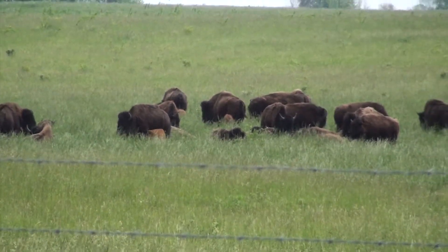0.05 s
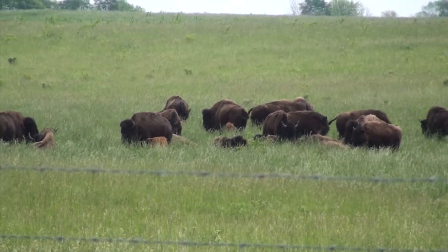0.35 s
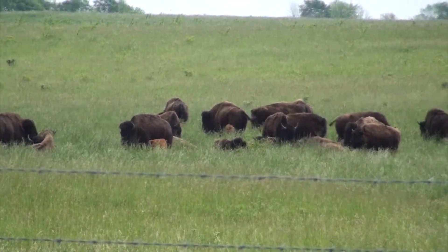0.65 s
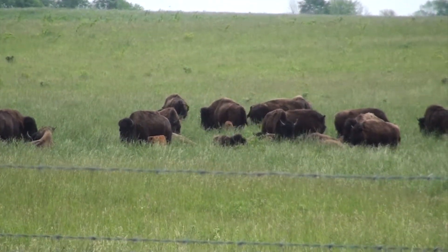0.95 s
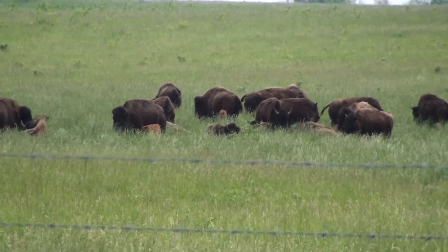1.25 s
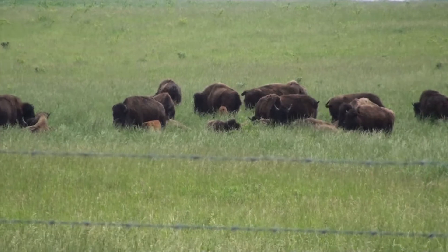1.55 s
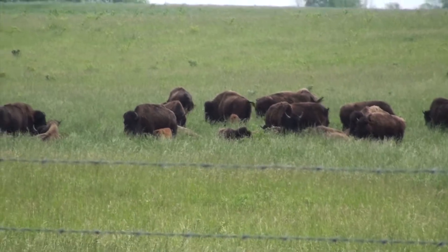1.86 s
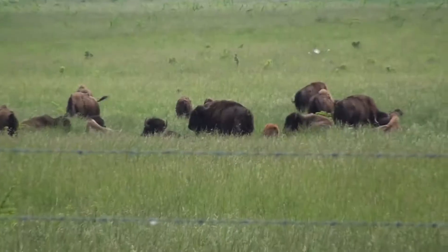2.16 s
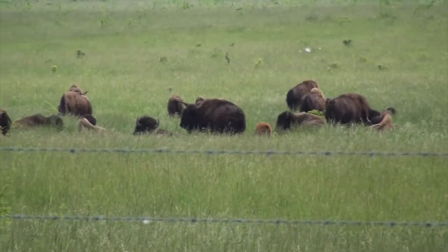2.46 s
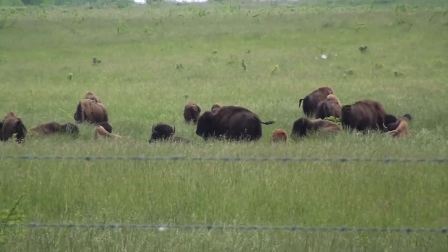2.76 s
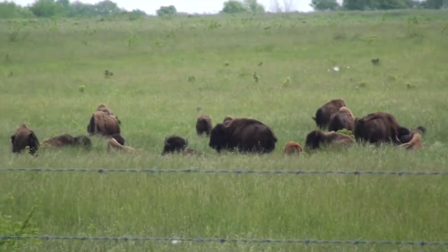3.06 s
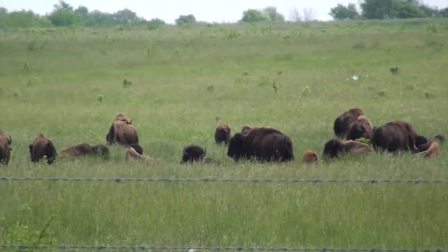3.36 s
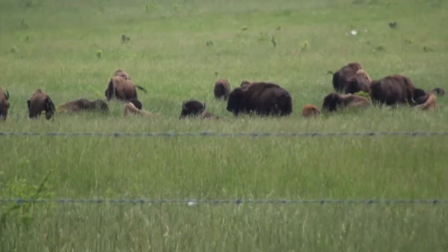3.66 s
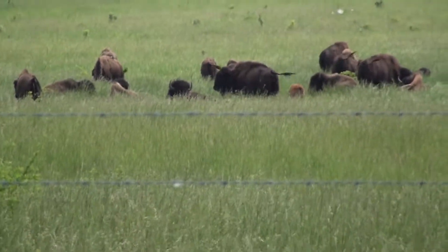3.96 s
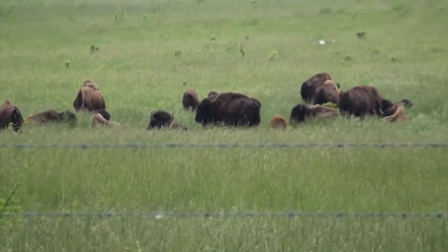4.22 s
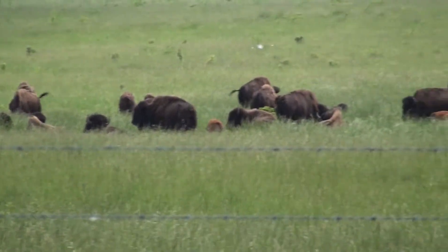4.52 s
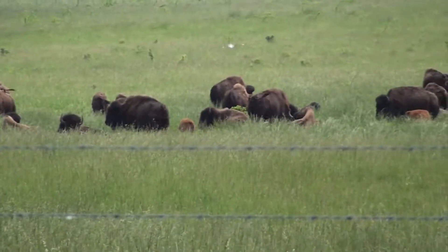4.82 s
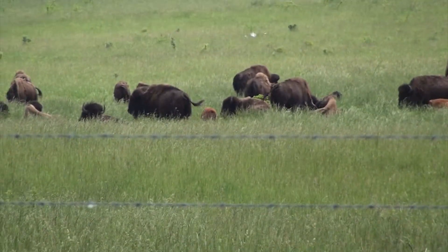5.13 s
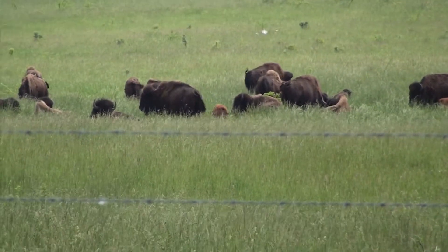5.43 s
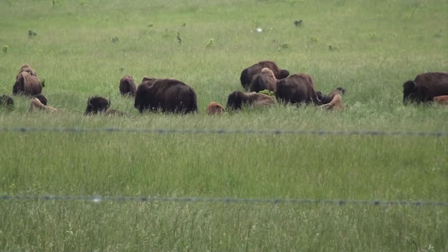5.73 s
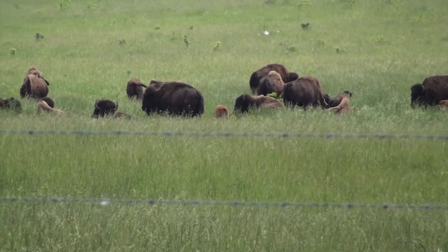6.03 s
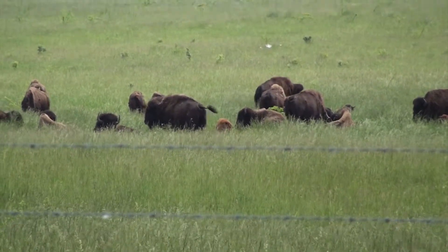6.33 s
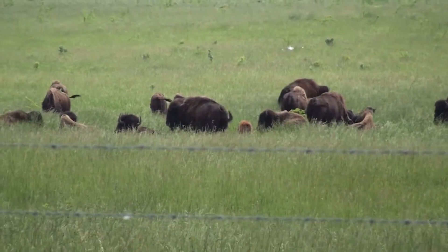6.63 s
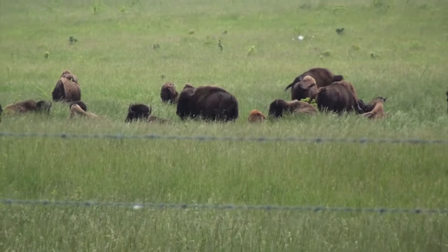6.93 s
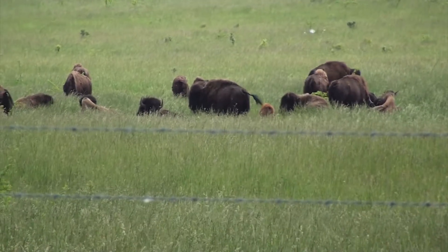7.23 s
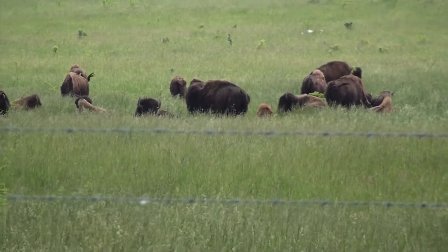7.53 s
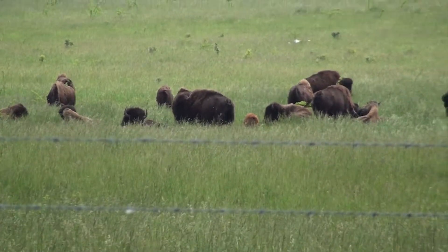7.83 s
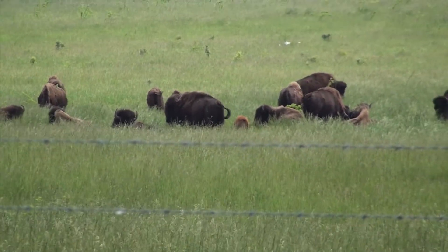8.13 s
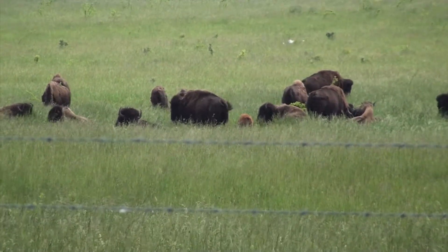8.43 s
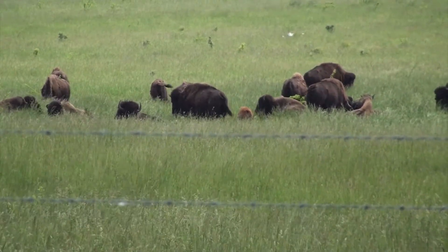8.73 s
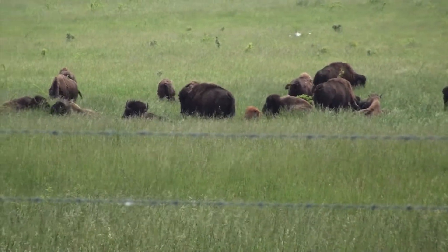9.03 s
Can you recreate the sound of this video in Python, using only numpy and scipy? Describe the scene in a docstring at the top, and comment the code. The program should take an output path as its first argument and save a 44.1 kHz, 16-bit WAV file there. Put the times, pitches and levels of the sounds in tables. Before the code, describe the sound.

Wind rumbles unevenly on the microphone in open grassland, over a faint grass hiss and the hum of a distant road. Swallows twitter and rattle throughout, and far songbirds add faint chips and slurred notes. The wind is light at first, with a soft thump near 1 second and a stronger gust at 2. A blackbird gives a long, piercing, slightly falling whistle from 2.2 to 2.6 seconds. A few light dry ticks sound close by between 4.5 and 6.7 seconds, while distant cars swell past, most clearly around 6. From about 5.1 to 5.7 seconds a close swallow scolds in quick harsh rattles, ending in a sharp chip and fading twitter. The blackbird whistles again at 7.1 seconds. From there the wind is at its strongest, with repeated thumps and crackle, and a swallow's twitter grows louder around 9 seconds.

```python
"""Open grassland on a breezy day, near a distant road. Turbulent eddies press on the microphone as rumble and
crackle, and heavy thumps sound now and then; tyres hum, swelling as cars pass, and the grass hisses faintly. A
blackbird gives two long piercing whistles, swallows twitter and rattle (one passes close), and far songbirds
slur faint notes. Each voice is a tone of the syrinx, modulated in pitch and loudness and scattered by grass and
fence. A few light, dry ticks sound close by."""
import sys
import numpy as np
from scipy import signal
from scipy.fft import rfft, irfft
from scipy.io import wavfile

SR = 44100
rng = np.random.default_rng(int(sys.argv[2]) if len(sys.argv) > 2 else 0)


def wav_out(sig):
    """Save sig, one row per channel (or a flat mono array), as 16-bit PCM at SR to the path in sys.argv[1]."""
    wavfile.write(sys.argv[1], SR, np.round(np.clip(np.atleast_2d(sig).T, -1, 1) * 32767).astype(np.int16))


N = 404838
TIME = np.arange(N) / SR

# Levels are relative within each table. A balance is the left level minus the right.
# Gust strength. Each row: time in seconds, slow rumble in dB, fast flutter in dB.
GUSTS = [(0.0, -44, -52), (0.46, -39, -52), (0.54, -38, -38), (0.64, -51, -59), (0.74, -37, -41),
         (0.87, -28, -33), (0.97, -47, -57), (1.05, -25, -30), (1.25, -40, -53), (1.63, -39, -54),
         (1.74, -31, -36), (1.94, -38, -39), (1.965, -35, -36), (1.995, -22.5, -24.5), (2.32, -30, -26),
         (2.58, -30, -37), (2.76, -28, -22), (3.25, -28, -24), (3.48, -28, -30), (3.6, -35, -40),
         (4.24, -29.5, -26), (4.55, -32.5, -37), (5.09, -30.5, -29), (5.29, -37.5, -44), (5.45, -27.5, -34),
         (5.67, -45.5, -55), (5.75, -18, -25), (5.8, -35, -31), (5.96, -22, -22), (6.03, -25, -22),
         (6.45, -29, -36), (6.76, -28, -42), (7.01, -21, -25), (7.03, -29, -30), (7.23, -23, -27),
         (7.59, -29, -30), (7.65, -17, -22), (7.72, -25, -22), (7.95, -24, -24), (8.1, -26, -30),
         (8.33, -22, -20.5), (8.48, -23, -26), (8.58, -21, -19), (8.72, -22, -23), (8.82, -29, -35),
         (8.87, -17, -24), (8.9, -24, -23), (9.02, -22, -21), (9.15, -21, -23.5), (9.18, -28, -25)]
# Side the wind comes from. Each row: time in seconds, relative balance in dB.
WIND_SIDE = [(0, -3), (2, 0), (2.7, -0.02), (3.3, -.5), (4.5, -0.43), (5.7, 0), (6.7, 0), (7.3, 2),
             (7.7, 0), (9.18, 2)]
# Strength of the finest eddies. Each row: time in seconds, level in dB.
RAGGEDNESS = [(0, -4), (1.6, -4), (2.15, 2), (2.62, -7), (2.77, 0), (3.4, -2.5), (3.9, -6), (4.7, -5),
              (5.1, -1), (5.75, -4), (5.95, 3), (6.2, 0), (6.7, -2), (7.6, 2), (8.5, 4), (9.18, 6)]
# Wind spectra, from large eddies to small. Each row: frequency in Hz, spectral density in dB.
RUMBLE_SPECTRUM = [(10, -21), (25, -3.5), (45, -1), (75, 0.5), (115, -6), (170, -21), (400, -43),
                   (900, -80)]
FLUTTER_SPECTRUM = [(40, -19.5), (100, -4.5), (160, 0.5), (215, -3.5), (300, -13.5), (420, -25),
                    (700, -37.5), (1500, -61), (4000, -85)]
BLUSTER_SPECTRUM = [(90, -29), (200, -4), (280, -1), (380, -5.5), (520, -12), (800, -22.5), (1500, -39.5),
                    (4000, -75)]
RUSH_SPECTRUM = [(150, -27.5), (450, -2.5), (700, -3.5), (1200, -9.5), (2000, -16.5), (3000, -29.5),
                 (6000, -41.5), (12000, -64.5)]
# Phase between the microphone ports. Each row: frequency in Hz, lead of the left in radians.
PORT_PHASE = [(20, 0), (60, -.55), (125, -1.05), (300, -1.5), (500, -1.2), (860, -.5), (2150, -.15)]
# Spectra of the other noises. Each row: frequency in Hz, spectral density in dB.
ROAD_SPECTRUM = [(100, -10), (330, -16), (580, -12), (780, -3), (980, 0.5), (1250, -4), (1550, -8.5),
                 (2000, -12.5), (2600, -21.5), (3500, -26.5), (6000, -46)]
CAR_SPECTRUM = [(250, -21), (580, -15), (730, -3.5), (850, 2), (1000, -4), (1350, -16.5), (2000, -24),
                (3000, -37), (5000, -58)]
TYRE_SPECTRUM = [(600, -35), (1250, -12), (1600, -3), (2000, 0), (2350, -12), (3000, -24), (5000, -48)]
GRASS_SPECTRUM = [(500, 1.5), (3000, -2.5), (4300, 4.5), (5500, -3), (7000, -6), (8600, -6), (9800, -10.5),
                  (12500, -7.5), (14400, -11), (15200, -18.5)]
CRACKLE_SPECTRUM = [(90, -14), (250, 0), (450, -3), (800, -9), (1500, -17), (2500, -26), (4000, -36),
                    (8000, -55)]
TICK_SPECTRUM = [(500, -15), (1100, 0), (1500, -3), (2000, -1), (2500, -14), (3500, -30), (8000, -60)]
# Envelopes of the far road, the grass and the far birds. Each row: time in seconds, level in dB.
ROAD_LEVEL = [(0, -43.5), (1.95, -43), (2.1, -45.5), (2.55, -52.5), (3.3, -48.5), (4.4, -48), (5.9, -47.5),
              (9.18, -44)]
GRASS_LEVEL = [(0, -58.5), (1.98, -58.5), (2.06, -62), (9.18, -62)]
CHORUS_LEVEL = [(0, 1.5), (1.1, 1.5), (1.5, -2), (3.2, -2.5), (3.6, -7), (4.6, -6), (4.9, 4), (5.9, 1),
                (6.4, -7), (8.2, -8), (9.18, 0)]
# Nearer cars. Each row: time when closest in seconds, roar in dB, tyre hiss in dB,
# seconds to fall by about 3 dB.
CAR_PASSES = [(4.58, -43.5, -53, 0.3664), (5.93, -34.3, -41, 0.3258), (6.3, -42, -52, 0.1265),
              (6.5, -54, -47, .12), (7.25, -40.5, -59, 0.4377)]
# Lone gliding notes. Each row: start and length in seconds, first and last pitch in Hz,
# level in dB, bend (positive glides early, negative late).
SLURS = [(.625, 0.22, 2143, 2137, -54, 1), (.66, .06, 3650, 3950, -58, 1), (.66, .05, 3020, 3130, -59, 1),
         (.86, .04, 2500, 2750, -57, 1), (1.13, .025, 8900, 6850, -53, 2.5),
         (1.147, .062, 6950, 6430, -54, 1.2), (1.207, .006, 6900, 5450, -46, 1),
         (1.211, 0.064, 5560, 4650, -44, .5), (1.212, 0.06, 5230, 4130, -47, 0.3),
         (1.222, .045, 3780, 4050, -55, 1), (1.281, .013, 5200, 8300, -55, .5),
         (1.511, 0.084, 2463, 2280, -53, -0.5), (1.56, .22, 3200, 3270, -63, 1),
         (1.681, 0.0227, 7000, 5680, -49, 5), (1.697, 0.02, 5670, 8690, -57, -.5),
         (1.51, .055, 3850, 3970, -58, 1), (2.112, 0.162, 3782, 3558, -58, 1),
         (2.115, .065, 6780, 6620, -58, 1), (2.459, 0.0827, 4850, 4570, -50, 2),
         (2.615, 0.088, 4260, 3762, -56.5, 1.5), (2.714, 0.079, 2936, 2980, -54.5, 2),
         (2.79, .14, 2980, 3100, -62, 1), (3.021, 0.158, 3392, 3510, -64, -0.5),
         (3.86, .15, 4538, 4152, -59, 2.5), (4.149, 0.158, 5310, 5222, -65.5, 0.5),
         (5.656, 0.022, 4700, 4180, -25, 2), (5.682, 0.118, 5610, 5560, -58, 1),
         (6.14, .05, 4450, 4350, -62, 1), (6.19, .11, 4080, 3830, -65, 1), (6.68, .2, 4090, 3990, -66, 2),
         (6.882, .025, 6650, 6550, -60, 1), (7.0, .02, 6600, 6650, -62, 1),
         (7.7, 0.065, 3480, 3250, -60, 1.5), (7.96, .055, 3600, 3430, -62, 1),
         (8.115, .06, 6700, 6520, -65, 1), (8.208, 0.125, 5110, 4920, -60, 1.5),
         (8.608, .022, 4470, 4380, -51, 1), (8.632, .035, 4450, 4330, -55, 1),
         (8.672, .022, 4400, 4320, -55, 1), (8.7, .04, 4420, 4330, -59, 1),
         (9.088, .03, 6550, 5950, -50, .3), (6.03, .07, 5500, 5150, -60, 1),
         (7.485, .055, 3450, 3200, -62, .3)]
# Lone trills. Each row: start and length in seconds, first and last pitch in Hz, level in dB,
# sweeps per second, sweep depth as a share of the pitch.
TRILLS = [(1.737, .132, 4042, 3113, -52, 140, .07), (1.28, 0.079, 7820, 7150, -57, 297, 0.087),
          (1.669, 0.042, 4603, 4326, -51, 86, 0.56), (2.113, .07, 8250, 7900, -53, 260, .16),
          (2.999, 0.072, 4405, 4183, -52.5, 223, 0.19), (3.298, 0.75, 8550, 8430, -73, 65, 0.212),
          (4.69, .055, 4350, 4350, -60, 115, .15), (4.738, .035, 6100, 5900, -58, 55, .2),
          (4.738, .04, 3950, 3750, -57, 55, .15), (5.003, .014, 6800, 6800, -59, 140, .25),
          (5.751, 0.0624, 10000, 8630, -56.5, 240, 0.081), (7.418, .046, 4850, 3950, -54, 200, .12),
          (7.678, .025, 4050, 3550, -58, 200, .12)]
# A far bird's pips. Each row: start in seconds, level in dB.
PIPS = [(.005, -61), (.2, -60), (.925, -60), (1.44, -58), (8.968, -57), (9.03, -57), (9.16, -51)]
# One beat of a rattle. Each row: share of the beat, pitch factor, amplitude from 0 to 1.
RATTLE_BEAT = [(0, 1.24, .05), (.11, 1.1, .75), (.24, .76, .3), (.31, 1.24, .75), (.42, 1.1, 1),
               (.62, .97, .6), (.82, .96, .3), (1, 1.05, .03)]
# Swallows' alarms. Each row: start and rattle length in seconds, pitch in Hz, level in dB.
ALARMS = [(.02, .046, 4950, -59), (.333, .05, 4950, -55.5), (.59, .046, 4950, -56.5),
          (.745, .046, 4900, -55), (.98, .046, 4950, -59), (1.926, .046, 4750, -46.5),
          (4.789, .046, 4750, -46.5), (5.063, .046, 4650, -37.5)]
# Swallows' twitter. Each row: start in seconds, level in dB, pitch factor.
TWITTERS = [(.062, -65, 1.03), (.127, -64, 1), (.192, -65, 0.99), (.428, -59, 0.92), (.505, -60, 1.024),
            (.857, -66, 1.017), (.93, -65, 0.97), (1.01, -64.5, 0.93), (2.18, -61.5, 1.0),
            (2.6, -62, 0.925), (4.87, -66, .94), (5.168, -56.5, 1.01), (5.26, -51.5, 1.02),
            (6.145, -67, .97), (6.228, -67, .96), (6.31, -66, .96), (7.665, -64.5, 0.98),
            (7.755, -65, 0.99), (8.775, -54, 0.985), (8.861, -51.5, 0.98), (8.945, -49.5, 0.98),
            (9.028, -46, 0.976)]
# Far birds' repeated calls. Each row: start in seconds, number of syllables, spacing in seconds.
CHIP_RUNS = [(.082, 5, .079), (3.35, 7, .08)]
SONG_RUN = (2.707, 5, .1255)
SPARROW_RUN = (8.367, 3, .092)
# Swell of those runs. Each pair: first and last level in dB.
SONG_DB, SPARROW_DB, CHIP_DB = (-58, -53), (-58, -51), [(-63, -59), (-64, -64)]
# Single thumps. Each row: time in seconds, level in dB, balance in dB, width in seconds.
THUMPS = [(0.522, -25, 2, .003), (1.045, -14.5, -0.5, .0038), (2.021, -8, 6.0, .0036),
          (2.159, -11, 0, .0025), (3.798, -20, 0, .002), (4.199, -16, -1, .002), (4.605, -19, 0, .002),
          (5.748, -9, 1.5, .003), (6.285, -11, 4, .002), (6.887, -14, 2, .003), (7.294, -9.5, 1.5, .0018),
          (7.398, -6, 2, .002), (7.625, -9, -1, .005), (8.255, -11, 0, .002), (8.357, -9, 0, .0012),
          (8.566, -5.5, -3.5, .0014), (8.606, -6.5, 2, .0013), (8.655, -11, 2, .002), (8.941, -11, 0, .002)]
# Tearing gusts. Each row: start and length in seconds, level in dB, upper edge in Hz.
CRACKLES = [(2.112, .025, -34, 3000), (6.951, .014, -36, 2500), (7.113, .016, -32, 1800),
            (7.292, .016, -28, 900), (7.393, .02, -19.5, 950), (7.66, .15, -31, 1300),
            (8.233, .013, -28, 1800), (8.254, .013, -29, 1400), (8.274, .045, -34, 3500),
            (8.342, .04, -27, 2200), (8.564, .026, -25, 4500), (8.606, .014, -25, 1200),
            (8.628, .035, -29, 3000), (8.878, .04, -29, 4500), (8.938, .025, -25, 4500),
            (9, .045, -25, 3500), (9.057, .02, -31, 4500)]
# Blackbird whistles. Each row: start and length in seconds, settled pitch in Hz,
# then levels in dB at the start, near the end and of the octave.
WHISTLES = [(2.171, 0.395, 5155, -41.5, -32.5, -69), (7.103, 0.3445, 5173, -39.5, -37.5, -78)]
# Dry ticks close by. Each row: start in seconds, level in dB.
TICKS = [(4.5017, -29), (4.5875, -30), (4.7255, -29.5), (5.7015, -30), (6.1928, -28), (6.2835, -26),
         (6.5051, -28), (6.7246, -34)]
# A close swallow's scolding. Each row: start and rattle length in seconds, pitch in Hz,
# level in dB, level of the opening flicks in dB.
SCOLDS = [(5.3745, .042, 5150, -31, -48), (5.451, .041, 4900, -28, -29.5),
          (5.5275, .041, 4750, -25.5, -29.5), (5.6062, .03, 4780, -24, -26)]
# Twitter that climbs in three steps. Each row: start in seconds, level in dB.
CLIMBS = [(5.812, -46), (5.895, -48.5), (5.976, -52.5)]


def amp(db):
    """Amplitude grows tenfold with every 20 dB."""
    return 10 ** (np.asarray(db) / 20)


def unit(x):
    """Normalisation to an rms of 1."""
    return x / np.sqrt(np.mean(x ** 2) + 1e-20)


def curves(rows):
    """Linear interpolation gives each column of a table one value per sample."""
    s, *columns = np.transpose(rows)
    return [np.interp(TIME, s, column) for column in columns]


def add(mix, s, sound):
    """Superposition: a sound joins the mix at s seconds."""
    part = mix[..., max(round(s * SR), 0):][..., :sound.shape[-1]]
    part += sound[..., :part.shape[-1]]


def filtered(x, order, hz, kind):
    """A maximally flat filter passes the low, high or middle band."""
    return signal.sosfilt(signal.butter(order, hz, kind, fs=SR, output="sos"), x)


def drift(size, hz):
    """Noise low-passed near hz is a smooth random motion of rms about 1."""
    padded = size + SR // 10
    rolloff = np.exp(-(np.fft.rfftfreq(padded, 1 / SR) / hz) ** 2)
    return unit(irfft(rfft(rng.standard_normal(padded)) * rolloff))[:size]


def over_frequency(rows, size):
    """Interpolation in log frequency gives one value per spectral bin."""
    hz, values = np.transpose(rows)
    return np.interp(np.log(np.fft.rfftfreq(size, 1 / SR) + 1), np.log(hz), values)


def noise(spectrum, correlation):
    """Partial coherence: two channels of coloured noise share some of their motion."""
    colour = amp(over_frequency(spectrum, N))
    mid, side = irfft(rfft(rng.standard_normal((2, N))) * colour, N)
    side *= np.sqrt((1 - correlation) / (1 + correlation))
    return unit(np.array([mid + side, mid - side]))


def panned(balance_db):
    """Constant-power panning: left and right gains of fixed total power."""
    gains = amp(np.array([balance_db, -balance_db]).reshape(2, -1) / 2)
    return gains / np.sqrt((gains ** 2).mean(0))


def wind(eddy_db=1.5, eddy_hz=30, full_db=-23, bluster_growth=1.288, rush_growth=1.16):
    """Turbulence shakes each microphone port; harder gusts shed smaller eddies and sound higher."""
    slow_db, fast_db = curves(GUSTS)
    side_db, = curves(WIND_SIDE)
    ragged_db, = curves(RAGGEDNESS)
    shared = drift(N, eddy_hz)
    per_port = np.array([drift(N, 2 * eddy_hz), drift(N, 2 * eddy_hz)])
    eddies = unit(amp(eddy_db * (shared + .841 * per_port)))
    rumble = noise(RUMBLE_SPECTRUM, .75) * amp(slow_db - 1) * panned(side_db + 4)
    flutter = noise(FLUTTER_SPECTRUM, .5) * amp(fast_db + 3)
    excess_db = fast_db - full_db
    bluster_db = full_db - 5.2 + 1.084 * ragged_db + bluster_growth * excess_db
    bluster = noise(BLUSTER_SPECTRUM, .55) * amp(bluster_db)
    rush = noise(RUSH_SPECTRUM, .55) * amp(full_db - 20 + ragged_db + rush_growth * excess_db)
    # the smallest eddies come in the sharpest bursts
    buffet = flutter * eddies ** .83 + (bluster + rush) * unit(eddies ** 1.63)
    return rumble * np.sqrt(eddies) + buffet * panned(side_db - 3)


def ports(x):
    """Phase difference: low sounds reach the two ports out of step, which widens the wind."""
    lead = over_frequency(PORT_PHASE, N + SR)
    return irfft(rfft(x, N + SR) * np.exp(.5j * np.array([lead, -lead])), N + SR)[:, :N]


def traffic(waver_db=1.3, balance_db=3.5):
    """Tyre noise wavers as it crosses moving air; by spreading, each car fades with its distance."""
    road = noise(ROAD_SPECTRUM, .784) * amp(curves(ROAD_LEVEL)[0] + waver_db * drift(N, 15.5))
    power = sum(amp([[roar_db], [hiss_db]]) ** 2 / (1 + ((TIME - s) / width) ** 2 / 2) ** 2
                for s, roar_db, hiss_db, width in CAR_PASSES)
    roar, hiss = np.sqrt(power)
    cars = noise(CAR_SPECTRUM, .893) * roar + noise(TYRE_SPECTRUM, .85) * hiss
    cars *= amp(waver_db * drift(N, 28.2))
    return (road + cars) * panned(balance_db)


def grass():
    """Broadband noise: the faint, even hiss of grass."""
    return noise(GRASS_SPECTRUM, .88) * amp(curves(GRASS_LEVEL)[0] - .69)


def syrinx(hz, envelope, jitter=.00363):
    """A bird's voice as an oscillator: phase is the integral of a slightly unsteady frequency."""
    unsteady_hz = hz * (1 + jitter * drift(len(hz), 400))
    return np.sqrt(2) * envelope * np.sin(2 * np.pi * np.cumsum(unsteady_hz) / SR)


def slur(length, start_hz, end_hz, db, bend, rise_s=.005, fall_share=.28):
    """An exponential glide: one note that starts quickly and fades at its end."""
    u = np.arange(0, length, 1 / SR) / length
    pitch = start_hz + (end_hz - start_hz) * np.expm1(-bend * u) / np.expm1(-bend)
    opening = np.minimum(u / min(rise_s / length, fall_share), 1) * np.minimum((1 - u) / fall_share, 1)
    envelope = np.sin(np.pi / 2 * opening) ** 2 * amp(2 * drift(len(u), 70))
    return amp(db) * syrinx(pitch, unit(envelope), jitter=.00714)


def trill(length, start_hz, end_hz, db, rate, depth, jitter=.023):
    """Sawtooth frequency modulation: a run of down-sweeps, the voice shut between them."""
    t = np.arange(0, length, 1 / SR)
    beat = np.cumsum(rate * (1 + .07 * drift(len(t), 120))) / SR % 1
    pitch = np.linspace(start_hz, end_hz, len(t)) * (1 + depth * (.5 - beat))
    envelope = np.sin(np.pi * beat) * signal.windows.tukey(len(t), .3) * amp(1.8 * drift(len(t), 150))
    return amp(db) * syrinx(pitch, unit(envelope), jitter)


def far_chorus(count=640, level_db=-67):
    """Random superposition: faint chips and buzzes from far birds swell in bouts."""
    out = np.zeros(N)
    bout_db, = curves(CHORUS_LEVEL)
    for when, span, pitch, fall, loud, kind in rng.random((count, 6)):
        hz = 3800 + 3600 * pitch ** 2.6
        db = level_db + bout_db[int(when * N)] + 6 * (loud - .5)
        note = .014 + .035 * span, hz, hz * (1.02 - .22 * fall), db
        sound = slur(*note, bend=1) if kind < .55 else trill(*note, rate=120, depth=.182)
        add(out, when * N / SR, sound)
    return out


def pip(db):
    """A short upward glide. Like every syllable, it is a list of (delay in seconds, sound)."""
    return [(0, slur(.024, 4300, 4500, db, bend=2))]


def rattle(length, hz, db, reach=.95, rasp_db=2.6, hiss_db=-29, beat_hz=94.5, sag=.04):
    """Joint pitch and amplitude modulation: each beat dives, breaks and dives again to the note."""
    t = np.arange(0, length, 1 / SR)
    beat = (beat_hz * t + .04 * drift(len(t), 120)) % 1
    share, factor, loudness = np.transpose(RATTLE_BEAT)
    depth = np.interp(t, [.007, .011], [.55, 1])  # the first beat is shallow
    sweep = reach * depth * (1 + .18 * drift(len(t), 150))
    pitch = hz * (1 + sweep * (np.interp(beat, share, factor) - 1) + sag * (.5 - t / length))
    pulses = (1 + depth * (np.interp(beat, share, loudness) - 1)) * np.sqrt(depth)
    rasp = amp(rasp_db * np.tanh(drift(len(t), 900)))
    envelope = unit(pulses * rasp * signal.windows.tukey(len(t), .08))
    hiss = filtered(rng.standard_normal(len(t)), 2, [4500, 13000], "band")
    voice = filtered(syrinx(pitch, envelope, jitter=.025), 6, 3600, "high")  # the rattle holds above 3.6 kHz
    return amp(db) * (voice + amp(hiss_db) * unit(hiss * np.sqrt(envelope)))


def alarm(length, hz, db):
    """Biphonation: after a flick, the two sides of the syrinx beat together; a broken note follows."""
    return [(-.009, slur(.008, 6400, 5200, db - 9, bend=.5)),
            (0, rattle(length, hz, db - 1, reach=.7, rasp_db=5, hiss_db=-21)),
            (.001, trill(length, .84 * hz, .81 * hz, db - 3.5, rate=88, depth=.16, jitter=.04)),
            (.047, trill(.011, .9 * hz, .86 * hz, db + 1.5, rate=180, depth=.2)),
            (.057, slur(.009, .925 * hz, .88 * hz, db + 5, bend=1)),
            (.063, slur(.014, .87 * hz, .895 * hz, db - 5, bend=1))]


def twitter(db, pitch):
    """Rapid frequency modulation: a swallow's double flick, hoarse diving buzz and falling note."""
    return [(.002, trill(.017, 7400 * pitch, 7600 * pitch, db, rate=114, depth=.17, jitter=.04)),
            (.019, trill(.032, 8200 * pitch, 7950 * pitch, db - 2, rate=220, depth=.15, jitter=.045)),
            (.043, slur(.011, 8300 * pitch, 6300 * pitch, db - 1.5, bend=.3)),
            (.053, slur(.034, 6950 * pitch, 6550 * pitch, db - .5, bend=.6))]


def chip(db):
    """A short downward glide, heard as a chip."""
    return [(.002, slur(.036, 4500, 3400, db, bend=.54))]


def thumps(gain_db=-3, centre_s=.006032):
    """A thump is a bipolar pressure pulse, one pull and push, made ragged by fast noise."""
    out, t = np.zeros((2, N)), np.arange(SR // 16) / SR
    for s, db, balance_db, width in THUMPS:
        u = (t - centre_s) / width
        pulse = u * np.exp((1 - u ** 2) / 2)
        turbulence = .502 * drift(len(t), 345.3) + .0794 * drift(len(t), 1510)
        swell = t / centre_s * np.exp(1 - t / centre_s)
        pressure = (pulse + turbulence * swell) * signal.windows.tukey(len(t), .1)
        add(out, s - centre_s / 2, amp(db + gain_db) * pressure * panned(balance_db))
    return out


def crackles(grain_db=3.5, grain_hz=260):
    """Intermittent turbulence: a tearing gust starts at once and dies in a sputter of small eddies."""
    out = np.zeros((2, N))
    sputter = noise(CRACKLE_SPECTRUM, .4) * unit(amp(grain_db * np.tanh(drift(N, grain_hz))))
    for s, length, db, edge_hz in CRACKLES:
        t = np.arange(0, 2 * length, 1 / SR)
        envelope = amp(db) * np.interp(t, [0, .003, length / 2, length], [0, 1, .8, 0])
        burst = sputter[:, round(s * SR):][:, :len(t)] * envelope
        add(out, s, filtered(burst, 4, edge_hz, "low"))
    return out


def whistle(length, hz, start_db, end_db, octave_db,
            quiver_hz=38.65, quiver=.0207, throb_db=4, sag=.055, leap=.197):
    """Vibrato and tremolo in step: a blackbird's note leaps up, drops back and sags, quivering."""
    t = np.arange(0, length, 1 / SR)
    u = t / length
    beat = np.cos(2 * np.pi * quiver_hz * t + .2 * drift(len(t), 9.2))
    overshoot = t / .0065 * np.exp(-t / .006)
    settling = .68 * np.exp(-t / .018) * (1 - np.exp(-t / .0018))
    pitch = hz * (1 + leap * (overshoot + settling) - sag * u + quiver * beat * (1 - .65 * u))
    swell_db = np.interp(u, [0, .75, 1], [start_db, end_db, end_db - 5])
    db = swell_db + throb_db * beat * (1 - .35 * u) + drift(len(t), 25)
    fade = np.minimum(t / .0031, 1) * np.minimum((length - t) / .0304, 1)
    octave = syrinx(2 * pitch, amp(octave_db + throb_db * beat) * fade * (1 - u))
    return syrinx(pitch, amp(db) * fade) + octave


def song_syllable(db):
    """Deep modulation breaks a rising whistle into a buzz, between a high tick and a falling chip."""
    return [(-.034, trill(.025, 7900, 7500, db - 5, rate=110, depth=.138, jitter=.05)),
            (-.017, slur(.022, 4850, 5150, db - 1, bend=-1)),
            (.002, trill(.037, 4950, 5250, db + 1.5, rate=105, depth=.36, jitter=.045)),
            (.035, slur(.028, 4050, 2950, db - 4.5, bend=.465))]


def ticks(gain_db=-2, decay_s=.003, edge_hz=3000):
    """Exponential decay: each tick is a puff of dull noise that dies in a few milliseconds."""
    envelope = sum(amp(db + gain_db) * np.exp(-abs(TIME - s) / decay_s) * (TIME >= s) for s, db in TICKS)
    return filtered(noise(TICK_SPECTRUM, .7) * envelope, 4, edge_hz, "low")


def haze(length, db, band_hz=(6500, 14000)):
    """Amplitude-modulated noise: the airy rasp around a harsh call."""
    size = round(length * SR)
    air = filtered(rng.standard_normal(size), 2, band_hz, "band")
    return amp(db) * unit(air * signal.windows.tukey(size, .2) * amp(3 * drift(size, 300)))


def scold(length, hz, db, flick_db):
    """Biphonation: between two flicks and a rattle, each side of the syrinx sounds its own pip."""
    return [(0, slur(.003, 9000, 6300, flick_db - 4.5, bend=.1)),
            (.0033, slur(.003, 8700, 6500, flick_db + 1.5, bend=.1)),
            (.0103, slur(.0085, 6850, 7200, db - 1.5, bend=.94)),
            (.0115, slur(.016, .99 * hz, 1.02 * hz, db - 6, bend=-1.5)),
            (.025, rattle(length, hz, db)),
            (0, haze(length + .027, db - 24))]


def climb(db):
    """A stepped carrier frequency: three short trills, each higher than the last."""
    return [(0, trill(.0211, 6000, 5800, db + 2, rate=95, depth=.255, jitter=.045)),
            (.023, trill(.027, 7450, 7750, db - 3.5, rate=105, depth=.148)),
            (.053, trill(.019, 8650, 8250, db - 4, rate=225, depth=.135, jitter=.05))]


def sparrow_buzz(db):
    """After a high tick, sweeps too fast for the ear to resolve fuse into one level buzz."""
    return [(-.013, trill(.012, 6300, 7200, db - 4, rate=200, depth=.2, jitter=.05)),
            (.0023, trill(.068, 4820, 4900, db, rate=140, depth=.154, jitter=.035))]


def series(start, count, spacing, first_db, last_db):
    """Periodic repetition of a syllable. Each row: start in seconds, level in dB."""
    levels = np.linspace(first_db, last_db, round(count))
    return [(start + k * spacing, db) for k, db in enumerate(levels)]


def notes():
    """Calls are sequences of notes; each is yielded as (start in seconds, sound)."""
    for voice, table in (whistle, WHISTLES), (slur, SLURS), (trill, TRILLS):
        for s, *call in table:
            yield s, voice(*call)
    chips = [row for run, swell in zip(CHIP_RUNS, CHIP_DB) for row in series(*run, *swell)]
    calls = [(twitter, TWITTERS), (climb, CLIMBS), (scold, SCOLDS), (alarm, ALARMS), (pip, PIPS),
             (song_syllable, series(*SONG_RUN, *SONG_DB)),
             (sparrow_buzz, series(*SPARROW_RUN, *SPARROW_DB)), (chip, chips)]
    for syllable, table in calls:
        for s, *call in table:
            for delay, sound in syllable(*call):
                yield s + delay, sound


def overtones(x, square=1.3, cube=3.2):
    """Nonlinearity: loud notes grow harmonics and sum tones, while faint ones stay pure."""
    return x + filtered(square * x ** 2 + cube * x ** 3, 4, 7500, "high")


def field(x, scatter_db, t60):
    """Scattering by grass and fence leaves a short tail that falls 60 dB in t60 seconds."""
    t = np.arange(SR // 2) / SR
    mid, side = rng.standard_normal((2, len(t))) * amp(-60 * t / t60) * (t > .002)
    tail = mid + .94 * side * np.array([[1], [-1]])
    tail /= np.linalg.norm(tail, axis=1, keepdims=True)
    scattered = amp(scatter_db) * signal.fftconvolve(x[None], tail, axes=1)[:, :N]
    return (x * panned(-.8) + scattered) / np.hypot(1, amp(scatter_db))


def birds(near_db=-46):
    """Direct sound dominates the loud, near calls; scattering blurs the fainter, farther ones."""
    near, far = np.zeros(N), np.zeros(N)
    for s, sound in notes():
        add(near if sound.std() > amp(near_db) else far, s, sound)
    close = field(overtones(near), scatter_db=-19, t60=.38)
    chorus = field(far_chorus(), scatter_db=1, t60=.45)
    return close + field(far, scatter_db=-5.5, t60=.27) + chorus


def scene():
    """Superposition of wind, road, ticks, grass and birds."""
    return ports(wind() + thumps() + crackles() + traffic()) + ticks() + grass() + birds()


def record(dry, edge_hz=15500):
    """Band limiting: a low-pass filter removes the top treble, and both ends are tapered."""
    tapered = dry * signal.windows.tukey(N, .0008)
    lowpass = signal.firwin(511, edge_hz, window=("kaiser", 9), fs=SR)
    return signal.oaconvolve(tapered, lowpass[None], "same", axes=1)


dry = scene()
out = record(dry)
wav_out(out)
```